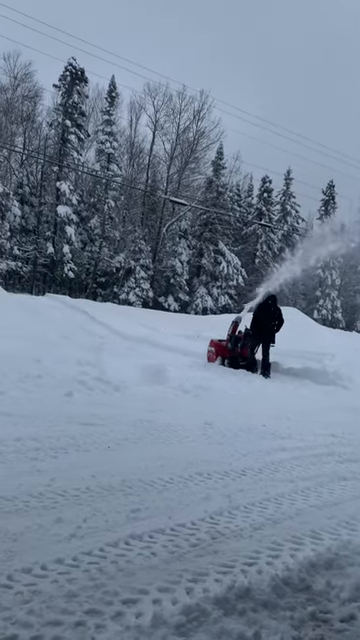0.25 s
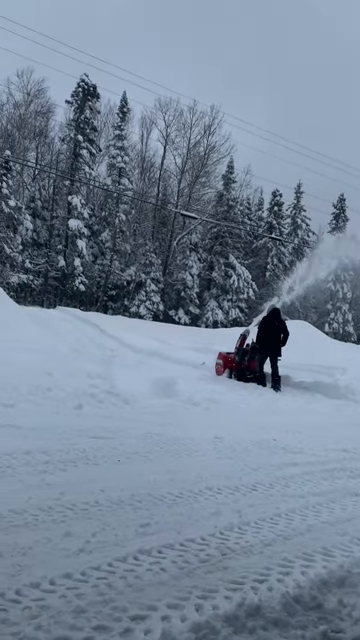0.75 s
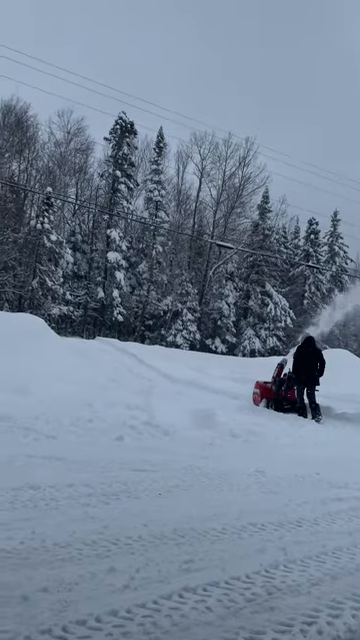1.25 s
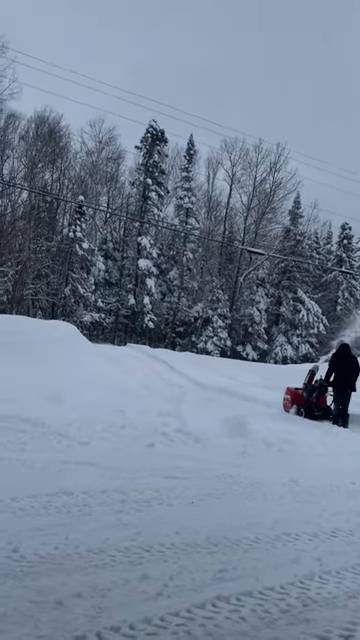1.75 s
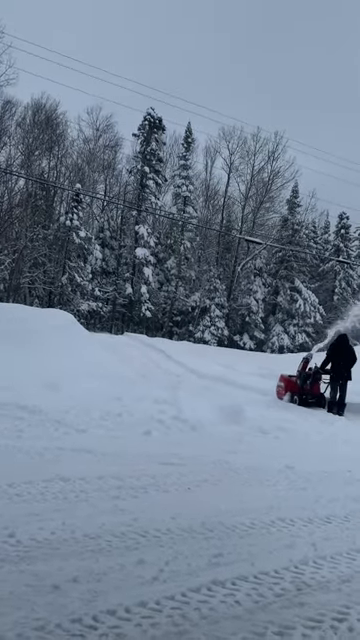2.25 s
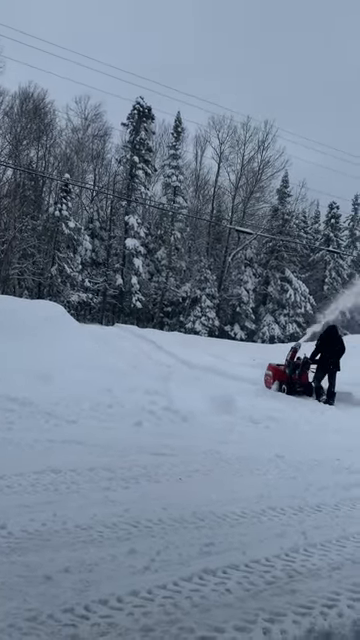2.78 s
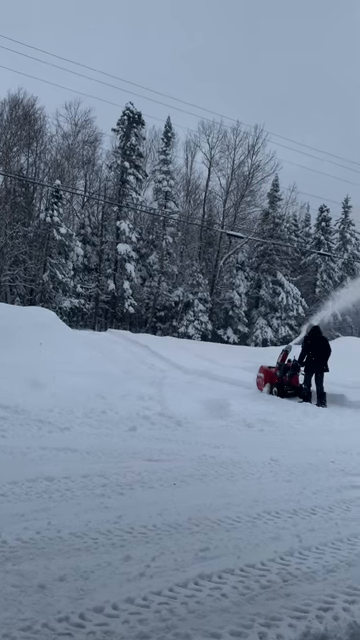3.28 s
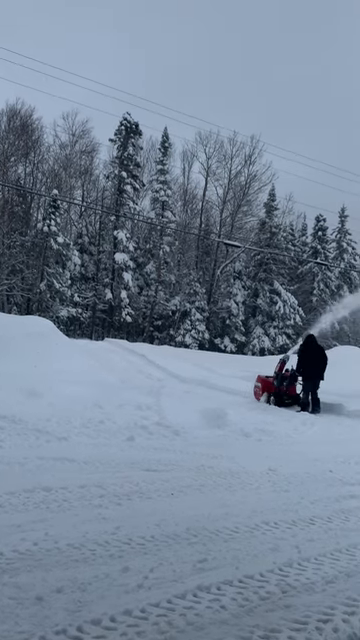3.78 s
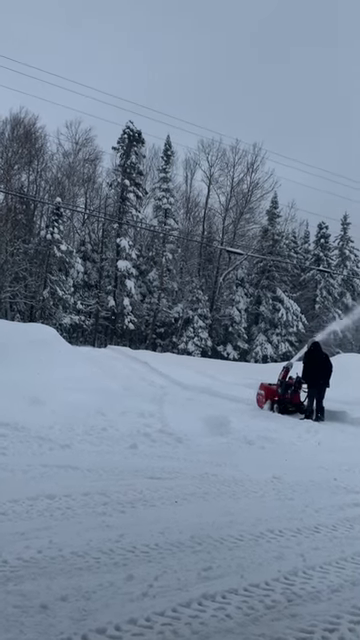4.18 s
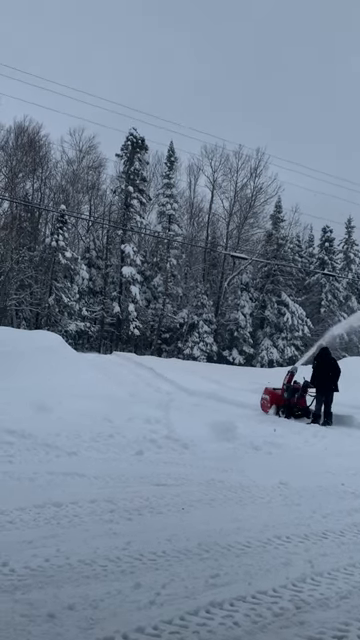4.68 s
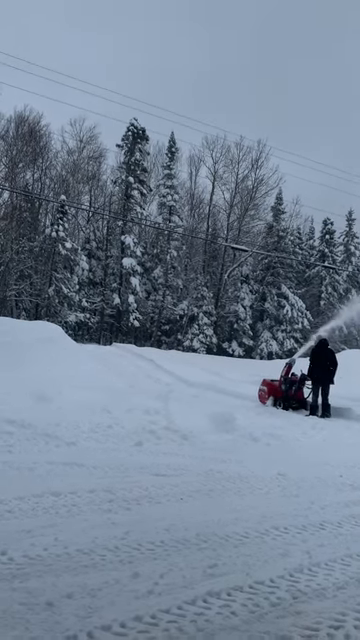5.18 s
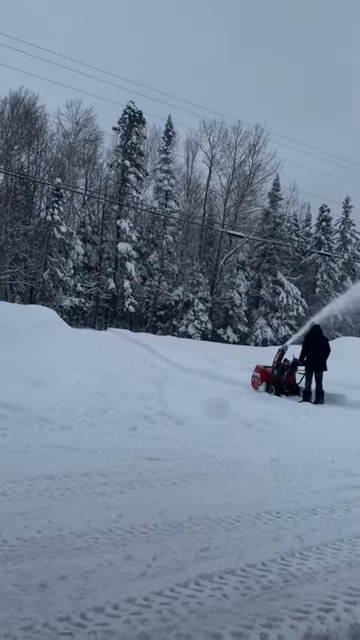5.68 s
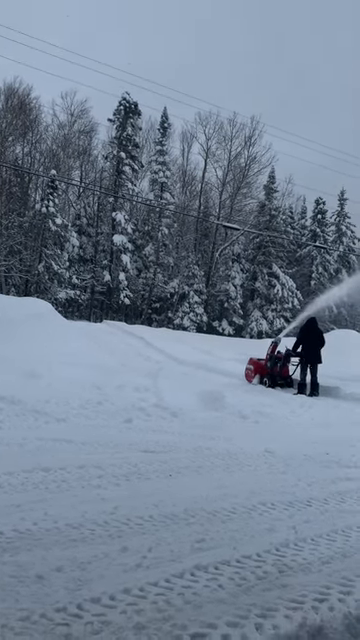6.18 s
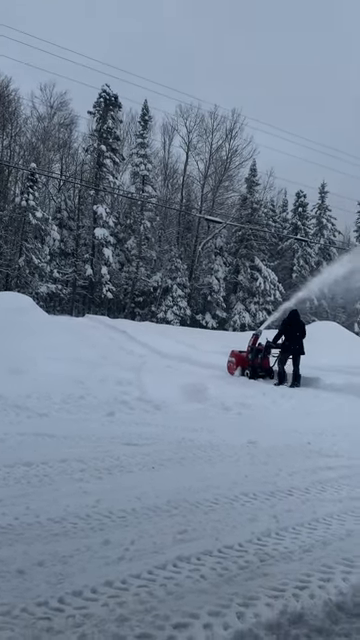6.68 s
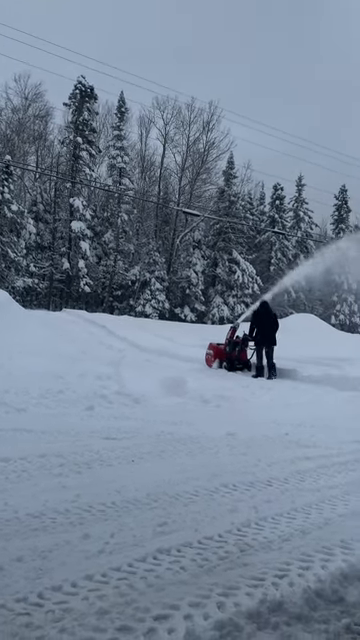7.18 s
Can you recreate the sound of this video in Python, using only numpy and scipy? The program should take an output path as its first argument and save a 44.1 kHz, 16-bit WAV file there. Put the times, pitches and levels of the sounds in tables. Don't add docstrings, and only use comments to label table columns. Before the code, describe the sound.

A walk-behind petrol snowblower is already running at 0 s and continues unbroken to about 7.4 s, heard across a snowy road on a handheld stereo phone. The single cylinder fires about thirty times a second, a rough low putter; the impeller turns more slowly, near twenty-four, and the two hums beat against each other. Low rumble, pulsing tin clatter, scraping in the chute and a broad hiss of thrown snow surround them. From 0 to 2 s it labours under full load, speed sagging and recovering about twice a second. It eases from 2.5 s and is nearly free by 4.5 s, slightly faster, thinner and more exhaust-led. Small grit rattles constantly; bigger lumps knock at 0.6, 1.2 and 1.8 s, cluster between 3 and 4.1 s, strike around 5.2 s, then thicken from 6.1 s to the end. Short diffuse echoes and slightly hollow treble drift with the hand.

```python
import sys
import numpy as np
from scipy import signal
from scipy.fft import rfft, irfft
from scipy.io import wavfile
from scipy.ndimage import uniform_filter1d, map_coordinates

SR = 44100
rng = np.random.default_rng(int(sys.argv[2]) if len(sys.argv) > 2 else 0)


def volts(x):
    e = np.asarray(x, float) / 20
    return 10 ** e


def log_audio(samples):
    frames = np.atleast_2d(samples).T
    limited = np.clip(frames, -1, 1)
    pcm = np.round(limited * 32767).astype(np.int16)
    wavfile.write(sys.argv[1], SR, pcm)


N = 328104
T = np.arange(N) / SR
HZ = np.arange(N // 2 + 1) * SR / N + 1e-3


def set_level(x, db):
    return x * volts(db) / np.sqrt(np.mean(x ** 2))


def walk(rate):
    coarse_sample = np.arange(0, N, 64)
    place = coarse_sample * rate / SR
    coarse = map_coordinates(rng.standard_normal(int(place[-1]) + 2), [place], order=3)
    return np.interp(np.arange(N), coarse_sample, coarse)


def smooth(spectrum):
    hz, db = np.transpose(spectrum)
    return volts(np.interp(np.log(HZ), np.log(hz), db, -90, -90))


def ring(modes):
    gain = 0
    for k, (hz, width, db) in enumerate(modes):
        gain = gain + (-1) ** k * volts(db) * width / (width + 1j * (HZ - hz ** 2 / HZ))
    return gain


def through(x, gain):
    return irfft(rfft(x) * gain, N)


def later(x, ms):
    return map_coordinates(x, [np.arange(N) - ms * SR / 1000], order=2, mode="wrap")


def puffs(turns, length, scatter_db):
    size = volts(scatter_db * np.clip(rng.standard_normal(400), -2, 1.5))
    fading = np.exp(-(turns % 1) / length)
    return uniform_filter1d(size[turns.astype(int)] * fading, size=160)


def churn(firing, blades, gas, slap, flicker_db):
    gate = 1 + gas * firing + slap * blades
    return set_level(rng.standard_normal(N) * gate * volts(flicker_db * walk(9)), 0)


def stack(turns, orders, load, flicker_db, rate, smear):
    total = 0
    for k, full_db, light_db in orders:
        swell = volts(light_db + load * (full_db - light_db) + flicker_db * walk(rate))
        total = total + np.sqrt(2) * swell * np.cos(2 * np.pi * k * turns + smear * k ** 2)
    return total


# start_hz, level_db (per Hz)
RUMBLE_SPECTRUM = [(40, -33), (70, -5), (110, -2), (200, -4.5), (280, -5), (330, -20), (450, -18.5),
                   (600, -14.5), (800, -21)]


def rumble(load):
    noise = through(rng.standard_normal(N), smooth(RUMBLE_SPECTRUM))
    return set_level(noise, -29.5) * volts(2.96 * load)


# start_s, level_db
SNOW_FLOW = [(0, -36.5), (.6, -35.5), (1.3, -37), (2, -35.5), (2.7, -37), (3.4, -38), (4, -38),
             (4.7, -37.5), (5.3, -37.5), (5.9, -37), (6.3, -36), (6.9, -36.5), (7.44, -36.5)]
# level_db, full_load_gain_db, flow_follow (dB per dB)
LAYER_LEVELS = [
    (-29, -2, 0.38),
    (-33.5, 2.2, -0.05),
    (-36.5, -2.5, 3.7),
    (-40, 6.5, .3),
    (-40.5, -0.37, 0.8),
]


def layer_levels(load):
    flow_db = np.interp(T, *np.transpose(SNOW_FLOW))
    swing_db = flow_db - flow_db.mean()
    return [db + gained_db * load + follow * swing_db for db, gained_db, follow in LAYER_LEVELS]


# pitch_hz, level_db (per Hz)
JET_SPECTRUM = [(500, -20), (1000, -6), (2500, -4), (2900, -9.5), (3500, -8.5), (3900, -9), (4400, -7),
                (5200, -10), (6200, -10.5), (8000, -11), (11000, -16), (13500, -23), (14300, -25.3),
                (15800, -32.5)]


def snow_jet(firing, blades, db):
    noise = churn(firing, blades, gas=0.8, slap=0.36, flicker_db=0.28)
    return set_level(through(noise, smooth(JET_SPECTRUM)), 8.57) * volts(db)


# pitch_hz, width_hz, level_db
CHUTE_MODES = [(1961, 108, 0), (2078, 36, 8), (2354, 116, -1.5)]
# pitch_hz, width_hz, level_db
LIP_MODES = [(2515, 300, 0.8), (2620, 410, -0.82)]


def sliding_snow(firing, blades, chute_db, lip_db):
    sliding = churn(firing, blades, gas=1.0, slap=3.9, flicker_db=0.2)
    chute = set_level(through(sliding, ring(CHUTE_MODES)), 1.14) * volts(chute_db)
    lip = set_level(through(sliding, ring(LIP_MODES)), 0) * volts(lip_db)
    return chute + lip


# pitch_hz, width_hz, level_db
HOUSING_MODES = [(1254, 51, -1), (1464, 67, 1), (1585, 147, 2.5), (1730, 430, -4.5)]


def housing_clatter(firing, blades, db):
    noise = churn(firing, blades, gas=0.17, slap=0.31, flicker_db=1.0)
    return set_level(through(noise, ring(HOUSING_MODES)), 0.79) * volts(db)


# pitch_hz, width_hz, level_db
CASING_MODES = [(646, 72, -6.5), (721, 50, -3.5), (785, 65, 0), (876, 74, -0.5), (944.5, 37.7, 3),
                (1130, 59, -7.5)]


def casing_clatter(firing, blades, db):
    noise = churn(firing, blades, gas=0.43, slap=0.15, flicker_db=0.47)
    return set_level(through(noise, ring(CASING_MODES)), 1.01) * volts(db)


def knocks(s, db, scrape_s):
    blows = np.zeros(N)
    blows[np.clip((s - .001) * SR, 0, N - 1).astype(int)] = volts(db)
    scrape = signal.lfilter([1], [1, -np.exp(-1 / (scrape_s * SR))], blows)
    return 4 * blows + scrape * rng.standard_normal(N)


# start_s, peak_db, casing_ring_db, chute_ring_db
BIG_LUMPS = [(0.616, -10.5, -4, -18), (1.2023, -9.5, -3, -16), (1.7958, -12.5, -9, -16),
             (2.0443, -14.5, -1, -14), (2.3655, -14, 1.5, -21), (2.7531, -13, -7, -12),
             (2.9548, -19, -10, -6), (3.2052, -14, -7, -8), (3.3762, -18, -14, -10),
             (3.5051, -11.5, -11, -13), (3.6691, -16.5, -20, -1.5), (3.8302, -11, -15, -11),
             (3.9626, -13.5, -6, -11), (4.1277, -11.5, -13, -10), (5.0558, -12, -9, -11),
             (5.1733, -8.5, -1, -14), (5.303, -9.5, -7, -25), (5.663, -18, -4, -5), (6.102, -6.5, -7, -15),
             (6.2997, -10.5, -16, -12.5), (6.3415, -13, 2, -3), (6.4215, -10, 1.5, -5),
             (6.547, -9, -18, -13), (6.5872, -13.5, -10, -4.5), (6.7436, -15, -8, -5.5),
             (6.8673, -21.5, 7, 6), (7.0327, -12, 0, -14), (7.2682, -14, -3, -7.5),
             (7.3126, -8.5, -10, -16), (7.346, -9, -2, -17)]


def lump_rows(shaft):
    grit_db, scatter_db = np.array([-23, -6.5, -9]), np.array([4.5, 2.5, 3])
    turn_s = np.flatnonzero(np.diff(shaft.astype(int))) / SR
    chance = np.clip(rng.standard_normal((400, 4)), -2, 1.6)[:len(turn_s)]
    grit_s = turn_s + .012 + .002 * chance[:, 3]
    grit = np.c_[grit_s, grit_db + chance[:, :3] * scatter_db]
    return np.r_[BIG_LUMPS, grit].T


def lump_knocks(shaft):
    s, peak_db, casing_db, chute_db = lump_rows(shaft)
    rattle = ring(HOUSING_MODES) + volts(-19.5) * smooth(JET_SPECTRUM)
    lumps = through(knocks(s, peak_db + 12.5, 0.0018), rattle)
    clangs = through(knocks(s, peak_db + chute_db + 21, 0.0026), ring(CHUTE_MODES))
    thuds = through(knocks(s, peak_db + casing_db + 15, 0.0035), ring(CASING_MODES))
    return lumps + clangs + thuds


# multiple, full_load_db, light_db
IMPELLER_ORDERS = [(2, -41, -43), (3, -30.5, -35), (3.5, -50, -37), (4, -29, -36), (4.5, -52, -36),
                   (5, -29, -40), (6, -34, -42), (7, -40, -43), (8, -39, -43), (9, -42, -45)]


def impeller_hum(shaft, load):
    return stack(shaft, IMPELLER_ORDERS, load, flicker_db=1.5, rate=6, smear=0.124)


# multiple, full_load_db, light_db
EXHAUST_ORDERS = [(1, -54, -58), (2, -27, -29.5), (3, -41, -40), (4, -33, -31), (5, -26, -24.5),
                  (6, -34, -32), (7, -40, -30.5), (8, -32, -38), (9, -38, -41), (10, -41, -53),
                  (11, -41.5, -55), (12, -41.5, -55), (13, -47, -52), (14, -52, -55)]


def exhaust_hum(crank, load):
    pulses = stack(crank, EXHAUST_ORDERS, load, flicker_db=0.0, rate=5, smear=.5)
    return pulses * volts(0.94 * walk(22))


# start_s, impeller_turns_per_firing, load (0-1)
DRIVE_STATE = [
    (0, .785, 1),
    (1.6, .785, 1),
    (2.5, .784, .8),
    (3.4, .789, .6),
    (4.3, .791, .3),
    (4.8, .811, .12),
    (5.3, .808, .05),
    (6.2, .791, .05),
    (6.8, .803, .05),
    (7.44, .803, .05),
]
# start_s, sag_hz
AUGER_BITES = [(.05, .55), (.5, .5), (.96, .2), (1.44, .3), (1.91, .4), (2.38, .4), (2.86, .3), (3.24, .4),
               (3.6, .17), (3.96, .15), (4.32, .35), (4.68, .5), (5.14, .2), (5.64, .08), (6, 0),
               (6.36, .15), (6.78, .2), (7.36, .15)]


def snowblower():
    free_hz, droop_hz = 31.4, 1.25
    s, *drive = np.transpose(DRIVE_STATE)
    belt, load = (np.interp(T, s, column) for column in drive)
    s, sag_hz = np.transpose(AUGER_BITES)
    bite_count = np.interp(T, s, np.arange(len(s)))
    hunt_hz = np.interp(T, s, sag_hz) * np.cos(2 * np.pi * bite_count)
    fire_hz = free_hz - droop_hz * load - hunt_hz
    crank = np.cumsum(fire_hz * (1 + 0.0007 * walk(12))) / SR
    shaft = np.cumsum(belt * fire_hz * (1 + 0.0019 * walk(6.5))) / SR
    firing = puffs(crank, 0.35, scatter_db=4.0) * (0.87 + load)
    blades = puffs(shaft + 0.243, 0.35, scatter_db=5.0) * (1.3 - load)
    casing_db, housing_db, chute_db, lip_db, jet_db = layer_levels(load)
    snow = snow_jet(firing, blades, jet_db) + sliding_snow(firing, blades, chute_db, lip_db)
    tin = housing_clatter(firing, blades, housing_db) + casing_clatter(firing, blades, casing_db)
    hum = impeller_hum(shaft, load) + exhaust_hum(crank, load)
    return rumble(load) + snow + tin + lump_knocks(shaft) + hum


# start_s, extra_path_ms
BODY_BOUNCE = [(0, 1.39), (.9, 1.39), (1.5, 1.26), (2.2, 1.3), (3, 1.3), (4.35, 1.23), (5.1, 1.28),
               (6.15, 1.28), (6.6, 1.36)]


def mirrored(x):
    s, ms = np.transpose(BODY_BOUNCE)
    band = signal.butter(1, [1700, 8000], "band", fs=SR, output="sos")
    return later(signal.sosfilt(band, x), np.interp(T, s, ms))


def wall_echoes(heard, scattered):
    tail_s = np.arange(SR // 2) / SR
    tail = rng.standard_normal((2, SR // 2)) * np.exp(-tail_s / .08)
    walls = rfft(tail / np.sqrt(np.sum(tail ** 2, axis=1, keepdims=True)), N)
    walls = 1.1 * walls / np.sqrt(np.abs(walls) + 1e-9)
    return [later(echo, .3 * walk(1.5)) for echo in irfft(heard * walls * scattered, N)]


# pitch_hz, left_lead_rad, left_minus_right_db, direct_share (0-1)
MIC_PORTS = [(0, 0, -.3, 1), (110, 0, -1, 1), (280, 0, -2.5, .999), (450, .3, -2, .92), (700, .8, 1.5, .92),
             (1100, .5, 0, .96), (1600, -.1, 0, .985), (1950, .5, -1, .75), (2100, 2.1, -2.5, .75),
             (2450, 2.75, 0, .92), (3100, 2.9, 0, .7), (3400, 5, 5, .4), (3700, 7.6, 2, .5),
             (4700, 9.05, .5, .9), (5400, 9.65, 0, .92), (6200, 10.5, .5, .8), (7600, 12.2, 0, .95),
             (9300, 13, 0, .93), (10300, 14, 0, .8), (11100, 15.1, 0, .94), (13500, 15.9, 0, .98),
             (14200, 17.2, 0, .65), (15000, 18.3, 0, .85)]
BODY_SHARES = [
    [0.43],
    [0.15],
]
# start_s, level_db
HAND_AIM = [(0, -0.5), (.9, -0.5), (1.2, -1.5), (2.2, 0), (2.9, -0.5), (3.3, -1), (4.6, -2), (5, 0.5),
            (5.6, 1.5), (6, -1.5), (7.44, 0)]


def scene():
    hz, *columns = np.transpose(MIC_PORTS)
    lead, pan_db, direct = (np.interp(HZ, hz, column) for column in columns)
    side = np.array([[.5], [-.5]])
    machine = snowblower()
    bounced = np.array(BODY_SHARES) * rfft(mirrored(machine))
    heard = (rfft(machine) - bounced) * volts(side * pan_db)
    aim = volts(np.interp(T, *np.transpose(HAND_AIM)) + 1.55 * walk(3.97))
    echoes = wall_echoes(heard, np.sqrt(1 - direct))
    return irfft(heard * np.sqrt(direct) * np.exp(1j * side * lead), N) + aim * echoes


def top_cut(x):
    return signal.sosfilt(signal.butter(12, 16390, fs=SR, output="sos"), x)


def record(dry):
    mix = through(dry, HZ < 15800)
    return top_cut(mix)


dry = scene()
out = record(dry)
log_audio(out)
```